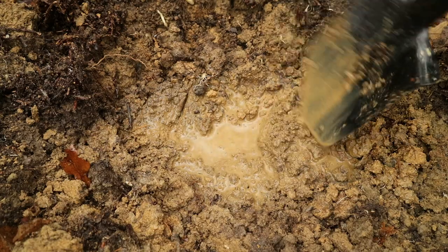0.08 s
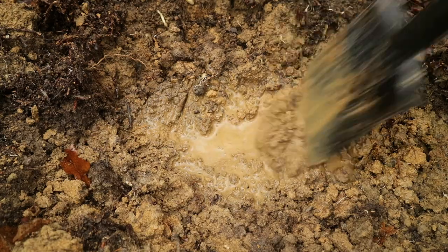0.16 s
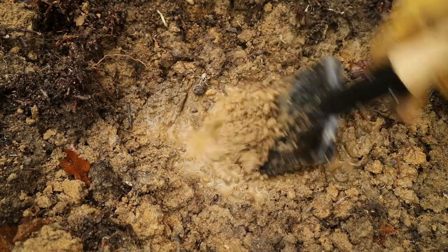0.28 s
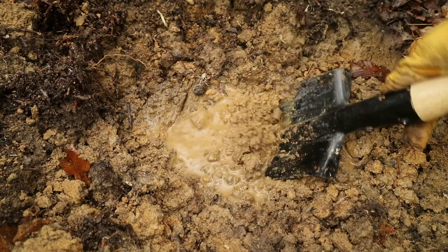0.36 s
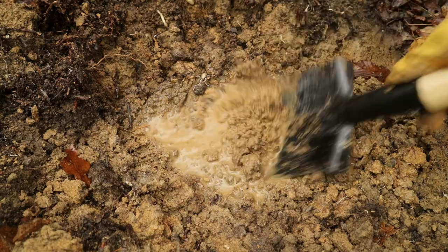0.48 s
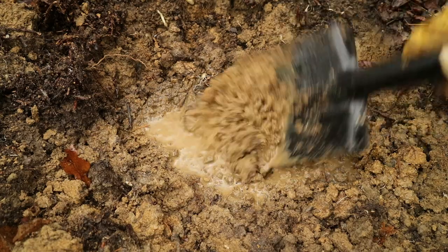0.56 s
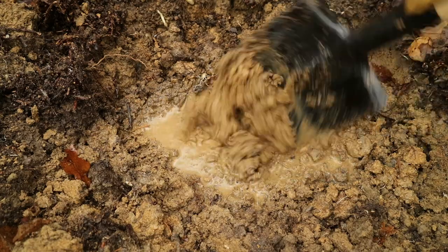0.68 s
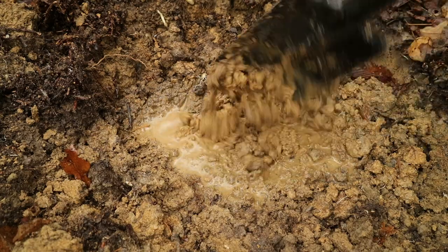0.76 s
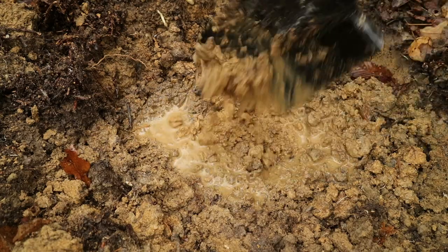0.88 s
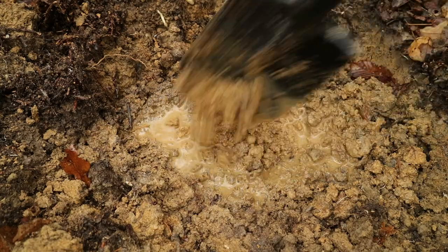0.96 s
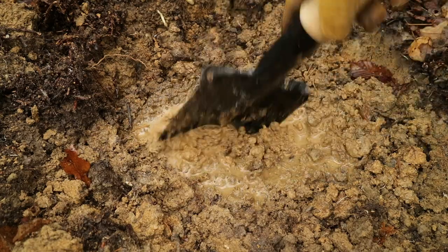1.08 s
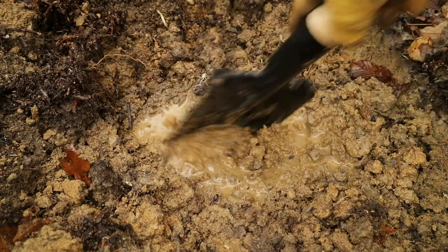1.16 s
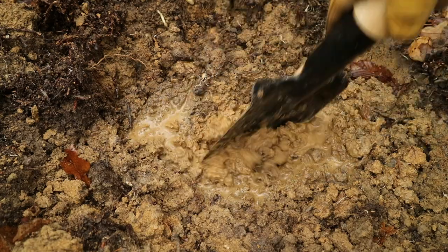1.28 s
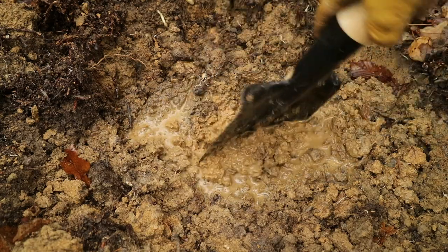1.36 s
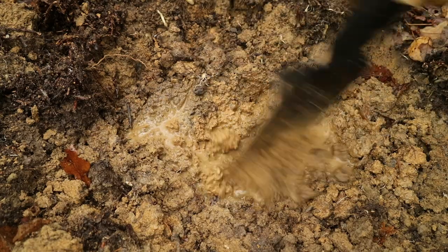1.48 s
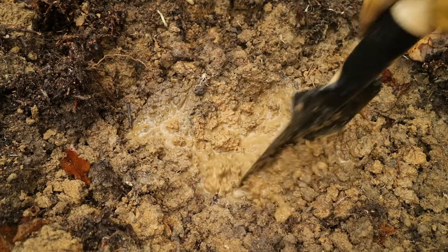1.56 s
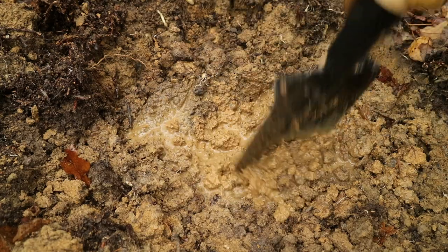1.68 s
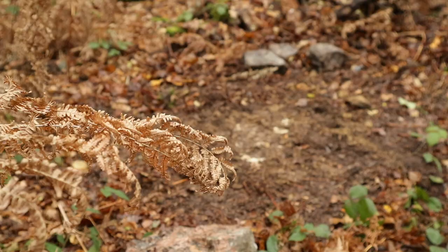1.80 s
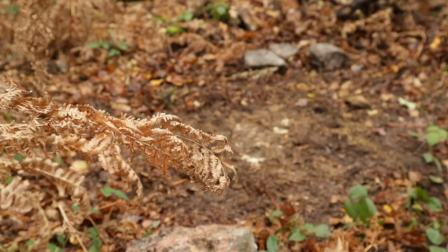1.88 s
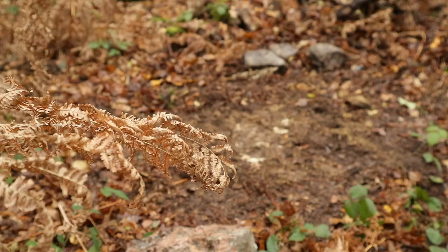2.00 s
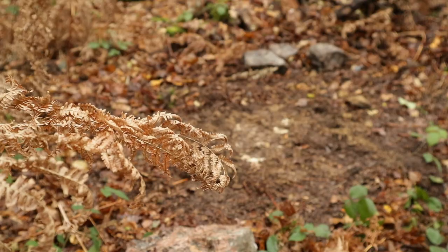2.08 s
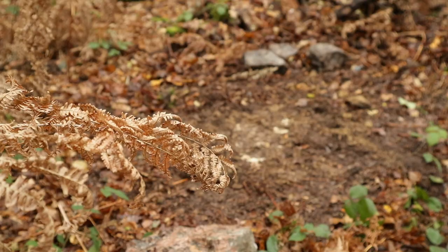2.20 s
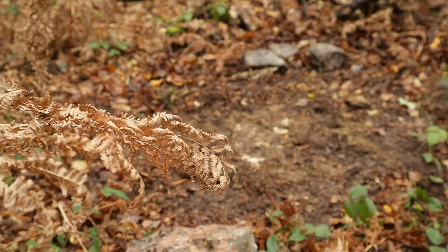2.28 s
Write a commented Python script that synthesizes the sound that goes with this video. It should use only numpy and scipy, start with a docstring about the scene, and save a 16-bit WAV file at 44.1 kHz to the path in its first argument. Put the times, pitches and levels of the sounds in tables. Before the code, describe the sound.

Close, dry outdoor sound of a shovel in a clay pit: one hard stab with a wet smack dominates early, then small ticks, wet clicks and sandy stirring scrapes, fading to soft hush, light rustling and a late low knock.

```python
"""In an outdoor pit, a small shovel works wet clay close by, over a soft hush made of coloured noise.
One hard stab ends in a slap: bursts of filtered grains and mud noise, with short ringing pops.
Then come short gritty strokes, swelling grain noise with tiny wet clicks, a clack and a late dull knock.
Low thuds and a short low ring of the blade are brief tones, separate ticks are very short rings,
the fizz is a swarm of tiny clicks, and swelling grain noise rustles faintly like leaves at the end."""
import sys
import numpy as np
from scipy import signal
from scipy.io import wavfile
from scipy.ndimage import uniform_filter1d

SR = 44100
rng = np.random.default_rng(int(sys.argv[2]) if len(sys.argv) > 2 else 0)


def materialize(psi):
    """Save the field psi as 16-bit PCM at rate SR to the path in sys.argv[1].

    A 1-D psi becomes a single channel; in a 2-D psi each row is a channel.
    """
    bounded = np.clip(np.atleast_2d(psi).T, -1, 1)
    quanta = np.round(bounded * 32767).astype(np.int16)
    wavfile.write(sys.argv[1], SR, quanta)


N = 101430
TIME = np.arange(N) / SR
EDGE_HZ = 15820  # top of the sound's band


def amp(db):
    """Turns decibels into a plain multiplier."""
    return 10 ** (np.asarray(db) / 20)


def unit(x):
    """Scales a sound to an average (rms) strength of 1."""
    return x / np.sqrt(np.mean(x ** 2) + 1e-20)


def add(mix, s, sound):
    """Mixes a sound in, starting at time s in seconds."""
    start = max(round(s * SR), 0)
    part = mix[start:][:len(sound)]
    part += sound[:len(part)]


def colour(x, points, size=2048):
    """Filters a sound to a given spectrum, with unit energy and no ringing ahead of the sound."""
    hz, db = np.transpose(points)
    f = abs(np.fft.fftfreq(size, 1 / SR))
    log_gain = np.log(amp(np.interp(np.log(f + 1), np.log(hz), db)))
    # the Hilbert transform gives the phase that puts the energy as early as possible
    spectrum = np.exp(np.conj(signal.hilbert(log_gain)))
    taps = np.fft.ifft(spectrum).real[:size // 2]
    return signal.fftconvolve(x, taps / np.linalg.norm(taps))[:len(x)]


def grains(per_s, spread_db, smooth):
    """Random clicks of uneven size, like grains rubbing, over a share of smooth friction noise."""
    size = amp(spread_db * np.minimum(rng.exponential(1, N), 4))
    sign = rng.choice([-1, 1], N)
    clicks = size * sign * (rng.random(N) < per_s / SR)
    return unit(unit(clicks) + smooth * rng.standard_normal(N))


def droplets(per_s, low_hz, high_hz, cycles, count=36):
    """Tiny wet clicks, each ringing for a few cycles at one of several pitches."""
    out, t = np.zeros(N), TIME[:SR // 40]
    for hz in np.geomspace(low_hz, high_hz, count):
        size = rng.uniform(0, 1, N) ** 2 * (rng.random(N) < per_s / count / SR)
        age = t * hz / cycles
        ring = np.sqrt(hz) * age * np.exp(-age) * np.sin(2 * np.pi * hz * t)
        out += signal.oaconvolve(size, ring)[:N]
    return unit(out)


def clumps(depth_db, size=160):
    """Quick uneven loudness: the material sticks and slips."""
    wander = uniform_filter1d(rng.standard_normal(N), size)
    wander = uniform_filter1d(wander, size)
    return unit(amp(depth_db * unit(wander)))


def swell(start, peak, end):
    """A level that builds to its peak and eases off until its end."""
    return np.interp(TIME, [start, peak, end], [0, 1, 0]) ** 1.18


# loudness of the outdoor hush over time; the crumbs follow it too: t/s, level/dB
HUSH_LEVEL = [(0, -52), (.19, -53.5), (.40, -62), (.47, -60.5), (.62, -58), (.70, -59.5), (1.2, -56.5),
              (1.6, -53), (1.72, -53), (2.14, -51.5), (2.21, -56), (2.3, -50)]


def hush(points):
    """Soft outdoor noise: steady random noise filtered to the given colour, rising and falling slowly."""
    level = amp(np.interp(TIME, *np.transpose(HUSH_LEVEL)))
    return level * colour(rng.standard_normal(N), points)


def crumbs():
    """Settling wet soil: soft low ringing ticks, 7 dB under the hush level."""
    ticks = droplets(per_s=90, low_hz=600, high_hz=3200, cycles=1.3)
    level_db = -7 + np.interp(TIME, *np.transpose(HUSH_LEVEL))
    return amp(level_db) * ticks


RING_RISE_S = 0.00006  # how fast pops and ticks start to ring
CRACK_RISE_S, CRACK_DECAY_S, SPATTER_DECAY_S = 0.00068, 0.0011, 0.0085
# tone colour of the crack and spatter: f/Hz, relative level/dB
CRACK_COLOUR = [(60, -40), (250, -18.5), (500, 3), (1000, 0), (2000, 6), (4500, -0.5), (6000, -8),
                (8000, -2.5), (9800, -15), (12000, -8.5), (16000, -21)]


def pop(db, hz, decay_ms, crack_db, spatter_db):
    """A ring of a few cycles at a rising pitch, with a sharp crack and a short spatter."""
    t = TIME[:SR // 16]
    body = (1 - np.exp(-t / RING_RISE_S)) * np.exp(-t / (decay_ms / 1000))
    glide = 1 + 2.5 * t / 2  # the pitch rises at 2.5 times its starting value per second
    ring = body / body.max() * np.sin(2 * np.pi * hz * t * glide)
    low_cut = signal.butter(2, 0.62 * hz, "high", fs=SR)
    ring = signal.lfilter(*low_cut, ring)
    a, b = rng.standard_normal((2, len(t)))
    crack = amp(crack_db) * a * np.exp(-t / CRACK_DECAY_S)
    # multiplying noise by its own size makes it spiky
    spatter = amp(spatter_db) * unit(b * abs(b)) * np.exp(-t / SPATTER_DECAY_S) / 2
    burst = (crack + spatter) * (1 - np.exp(-t / CRACK_RISE_S))
    return amp(db) * (ring + colour(burst, CRACK_COLOUR))


# wet slaps, pops, a clack and a late dull knock: t/s, level/dB before the low cut, starting f/Hz,
# ring decay/ms, crack level/dB and spatter level/dB (both relative to the pop, spatter before halving)
POPS = [(.0083, -27.5, 1250, 0.4, -1, -16), (0.267, -18, 1290, 4, -10, -16),
        (0.2877, -10, 1500, 0.58, -10, -7), (.2974, -1.5, 2930, 1.4, -5, -30),
        (0.3032, -3, 3140, 1.9, -2.5, -24), (0.3069, -4.5, 2170, 1.6, -19, -36),
        (0.3102, -11.5, 1170, 3.7, -12, -16.5), (.338, -26.5, 1300, .8, -2, -17),
        (0.5286, -19, 1860, 1.4, -19, -43), (0.532, -18.5, 2590, 0.7, -19, -10),
        (0.532, -23.5, 510, 1.5, -22, -11), (.7210, -19, 1760, 0.87, -5.5, -8),
        (.7213, -26.5, 4800, 0.69, -14, -24), (.7215, -32.5, 685, 1.5, -7, -19),
        (0.7296, -31.5, 1900, 1.2, -6, -18), (.7800, -30, 1900, 1.3, 1.5, -7.5),
        (1.0127, -33, 714, 1.14, -6, -19), (1.0573, -18.5, 1930, 0.86, 3.5, -16),
        (1.0723, -13.5, 3060, 0.78, 2.5, -22), (1.2867, -18.5, 3570, 1.64, -8, -18),
        (1.2873, -22, 1430, 1.6, 3, -35), (2.2447, -31, 925, 5.8, 4, -5), (2.246, -35, 503, 5.6, 3, 1),
        (2.248, -31.5, 1530, 2.7, -10, -7)]


def slaps_and_pops():
    """Wet slaps, pops, a clack and a late dull knock, each built from short rings and noise bursts."""
    out = np.zeros(N)
    for s, *pop_settings in POPS:
        add(out, s, pop(*pop_settings))
    return out


# the stab over time: t/s, grit level/dB and mud level/dB, both before their colour filters and final mix
STAB = [(.186, -50, -79), (.206, -48.5, -71), (0.208, -34, -53), (.228, -31.5, -60), (.241, -45, -53.5),
        (0.258, -32.5, -51.5), (.268, -25, -32), (.279, -33.5, -36), (.287, -31.5, -25.5),
        (0.296, -26, -25), (.304, -14, -17), (0.316, -45, -25), (.331, -49.5, -33), (0.346, -63, -58.5),
        (0.363, -49.5, -56), (.41, -62, -51), (.46, -76, -69)]
# tone colour of grit on the blade, shared with the crunches: f/Hz, relative level/dB
GRIT_COLOUR = [(60, -33), (400, -19.5), (1100, -4), (1600, -11.5), (2200, -7), (3100, -4), (4000, -7),
               (5000, -17), (6400, -11), (7900, -8), (9300, -20), (10700, -20.5), (12200, -17),
               (13500, -22), (16000, -27)]
# tone colour of squeezed mud, shared with the stirring: f/Hz, relative level/dB
MUD_COLOUR = [(25, -43.5), (70, -35), (125, -6), (230, -13.5), (330, -3.5), (560, 0.5), (800, -1.5),
              (1200, -0.5), (1600, -2), (2200, -7), (3500, -15), (5000, -25.5), (16000, -37)]


def stab():
    """Grit rasps along the blade and mud is squeezed aside, full of tiny bursting pockets."""
    s, grit_db, mud_db = np.transpose(STAB)
    # silent before the first and after the last table row
    grit_level = amp(np.interp(TIME, s, grit_db, -np.inf, -np.inf))
    mud_level = amp(np.interp(TIME, s, mud_db, -np.inf, -np.inf))
    sand = grains(per_s=3100, spread_db=5.0, smooth=0.34)
    pockets = droplets(per_s=4200, low_hz=1970, high_hz=13700, cycles=2.2)
    grit = unit(sand + amp(-1.5) * pockets) * clumps(depth_db=3.0, size=110) * grit_level
    mud = grains(per_s=3300, spread_db=4.5, smooth=0.37) * mud_level
    return colour(grit, GRIT_COLOUR) * amp(0.5) + colour(mud, MUD_COLOUR)


# lumps giving way: start t/s, level/dB before the filter, fine grit level/dB relative to that
CRUNCHES = [(0.2086, -26.5, -25), (0.2142, -32.5, -28), (0.2218, -27, -22), (0.228, -36, -7),
            (0.243, -38.5, -2), (0.2516, -38, -10), (0.262, -40, -3), (0.276, -31, 0), (0.283, -22, -17),
            (.6545, -44.5, -21), (0.9012, -55, 6.5), (1.0904, -29.5, -7), (1.516, -39, -1.5),
            (1.55, -43, 4), (1.5546, -46.5, 2), (1.566, -43, 7.5), (1.574, -43.5, 2.5), (1.106, -37.5, -10)]
# tone colour of the finest grit: f/Hz, relative level/dB
FINE_COLOUR = [(300, -13), (3000, 2), (14000, -5.5)]
CRUNCH_S = .0017  # time from start to peak, also the decay time


def crunches():
    """Gritty lumps give way under the blade, each a quick burst of spiky coarse and fine noise."""
    grit, fine = np.zeros((2, N))
    for s, db, fine_db in CRUNCHES:
        age = np.maximum(TIME - s, 0) / CRUNCH_S
        burst = amp(db) * age * np.exp(1 - age)
        grit = grit + burst
        fine = fine + amp(fine_db) * burst
    a, b = rng.standard_normal((2, N))
    coarse_noise, fine_noise = unit(a * abs(a)), unit(b * abs(b))
    return colour(grit * coarse_noise, GRIT_COLOUR) + colour(fine * fine_noise, FINE_COLOUR)


TICK_DECAY_S = 0.00095
TICK_WIDTH = 2.12  # the noise spans the pitch divided and multiplied by this


def tick(db, hz):
    """A crumb rings for an instant, inside a burst of splitting noise around its pitch."""
    t = TIME[:SR // 50]
    band = signal.butter(2, [hz / TICK_WIDTH, min(hz * TICK_WIDTH, EDGE_HZ)], "band", fs=SR)
    split = unit(signal.lfilter(*band, rng.standard_normal(len(t))))
    envelope = (1 - np.exp(-t / RING_RISE_S)) * np.exp(-t / TICK_DECAY_S)
    return amp(db) * envelope * (np.sin(2 * np.pi * hz * t) + amp(-11.5) * split)


# crumbs, drips and stalks: t/s, level/dB before the rise and decay, f/Hz
TICKS = [(.4485, -41.5, 1960), (0.515, -30, 1978), (0.5729, -32, 2010), (.6288, -39.5, 690),
         (0.7513, -31, 1650), (0.7648, -30, 1840), (0.7804, -32, 6300), (0.848, -38.5, 6900),
         (0.8528, -32, 3180), (.863, -39, 7650), (.953, -43, 12000), (.988, -51, 6700), (1.079, -30, 1950),
         (.209, -27.5, 940), (1.1214, -21.5, 2050), (1.1701, -31, 6240), (1.213, -32, 7300),
         (1.3108, -27, 2340), (1.518, -27, 7550), (1.7309, -24, 8600), (1.762, -29, 6130),
         (1.7924, -31, 6808), (1.8303, -37.5, 4800), (1.98, -32, 1860), (2.154, -33, 1180)]


def ticking():
    """Small separate ticks of crumbs, drips and stalks, each a very short ring with a little noise."""
    out = np.zeros(N)
    for s, db, hz in TICKS:
        add(out, s, tick(db, hz))
    return out


# low thuds and a short low ring of the blade (second row):
# t/s, level/dB before shaping, f/Hz, twice the decay time constant/s
THUDS = [(0.298, -26, 136, 0.0044), (0.3, -22, 327, 0.0075), (1.12, -40, 197, 0.0039),
         (1.359, -40, 136.6, 0.0058)]


def thuds_and_blade():
    """Low thuds and a short low ring of the blade: low tones that swell and die fast."""
    out = np.zeros(N)
    for s, db, hz, double_decay in THUDS:
        age = 2 * TIME / double_decay
        envelope = 2 * age * np.exp(-age)
        add(out, s, amp(db) * np.sin(2 * np.pi * hz * TIME) * envelope)
    low_cut = signal.butter(2, 105, "high", fs=SR, output="sos")  # Hz
    return signal.sosfilt(low_cut, out)


# stirring strokes: start t/s, peak t/s, end t/s, scrape level/dB and mud level/dB, before filters and mix
STROKES = [(0.512, 0.536, 0.64, -57.5, -51.5), (0.72, 0.8, 0.86, -50, -55.5),
           (1.05, 1.131, 1.17, -34, -40.5), (1.134, 1.268, 1.35, -43.5, -55.5),
           (1.314, 1.367, 1.41, -38, -41), (1.415, 1.447, 1.51, -44, -49.5),
           (1.47, 1.576, 1.677, -40.5, -49), (1.58, 1.633, 1.67, -46, -60)]
# tone colour of sandy clay dragging on the blade: f/Hz, relative level/dB
SCRAPE_COLOUR = [(60, -41.5), (200, -1), (500, -9), (900, 1.5), (1500, -16.5), (2200, -2), (3400, -1),
                 (4600, -7.5), (6300, -5.5), (8200, -2.5), (9500, -14), (12500, -10.5), (16000, -24)]


def stirring():
    """Each stroke drags sandy clay along the blade, bursts tiny wet pockets and pushes mud ahead of it."""
    scrape = sum(amp(db) * swell(a, b, c) for a, b, c, db, _ in STROKES)
    mud = sum(amp(db) * swell(a, b, c) for a, b, c, _, db in STROKES)
    sand = grains(per_s=2000, spread_db=-0.5, smooth=0.4) * clumps(depth_db=2.0)
    rasp = colour(scrape * sand, SCRAPE_COLOUR)
    wet = amp(-6) * scrape * droplets(per_s=600, low_hz=903, high_hz=9330, cycles=2.1)
    squeezed = colour(mud * grains(per_s=1200, spread_db=1.5, smooth=0.21), MUD_COLOUR)
    return amp(-2.5) * rasp + wet + squeezed


# one long swell of wet clay parting: start t/s, peak t/s, end t/s, level/dB
FIZZ = (0.70, 1.2, 2, -56.5)


def fizz():
    """Fine crackle of the wet clay parting: many tiny, very short high clicks."""
    start, peak, end, db = FIZZ
    crackle = droplets(per_s=570, low_hz=2500, high_hz=15300, cycles=1.0)
    return amp(db) * swell(start, peak, end) * crackle


# faint rustles: start t/s, peak t/s, end t/s, level/dB before the filter;
# the second row ends just before its peak time, so it builds up and then stops at once
RUSTLES = [(1.672, 1.713, 1.84, -41), (1.943, 2.053, 2.05, -53), (2.085, 2.139, 2.18, -48.5)]
# tone colour of dry leaves: f/Hz, relative level/dB
LEAF_COLOUR = [(60, -8.5), (400, -4.5), (1400, 2), (2600, -3), (4800, -5.5), (6300, -8.5), (7300, -7),
               (8500, -1), (9500, -21), (12500, -16.5), (16000, -24)]


def leaves():
    """Faint rustles of dry leaves: swelling grain noise with an uneven, clumpy loudness."""
    level = sum(amp(db) * swell(a, b, c) for a, b, c, db in RUSTLES)
    rustle = grains(per_s=1900, spread_db=4.0, smooth=0.47) * clumps(depth_db=4.5)
    return colour(level * rustle, LEAF_COLOUR)


def echoes(x, decay_s):
    """Scattered reflections that die away, starting 1.5 ms after the direct sound."""
    t = TIME[:SR // 3]
    taps = rng.standard_normal(len(t)) * np.exp(-t / decay_s) * (t > .0015)
    return signal.fftconvolve(x, taps / np.linalg.norm(taps))[:N]


# tone colour of the hush in the middle: f/Hz, relative level/dB
HUSH_COLOUR = [(25, -30), (70, -6.5), (140, -4), (300, -2.5), (700, -2), (1300, -4), (2500, -8.5),
               (5000, -10), (8200, -15), (10000, -16), (16000, -19.5)]
# tone colour of the hush that differs between left and right: f/Hz, relative level/dB
SIDE_COLOUR = [(30, -13), (200, 4.5), (500, 6.5), (1500, -10.5), (5000, -30)]
PIT_DB, PIT_DECAY_S = -15, 0.0057
OPEN_AIR_DB, OPEN_AIR_DECAY_S = -43, 0.055
SIDE_DB = -18  # relative to the hush level


def scene():
    """All sources sit in the middle, with short echoes from the pit, a trace of open air and a wider hush."""
    near = stab() + crunches() + thuds_and_blade() + stirring() + slaps_and_pops()
    near = near + ticking() + fizz() + crumbs() + leaves()
    pit = amp(PIT_DB) * echoes(near, PIT_DECAY_S)
    open_air = amp(OPEN_AIR_DB) * echoes(near, OPEN_AIR_DECAY_S)
    mid = near + pit + open_air + hush(HUSH_COLOUR)
    side = amp(SIDE_DB) * hush(SIDE_COLOUR)
    return np.array([mid + side, mid - side])


def record(dry):
    """Soft overload rounds off the loudest peaks, then a low-pass filter limits the band."""
    held = dry / (1 + (dry / .9) ** 6) ** (1 / 6)
    low_pass = signal.firwin(511, EDGE_HZ, window=("kaiser", 9), fs=SR)
    return signal.oaconvolve(held, low_pass[None], "same")


dry = scene()
out = record(dry)
materialize(out)
```